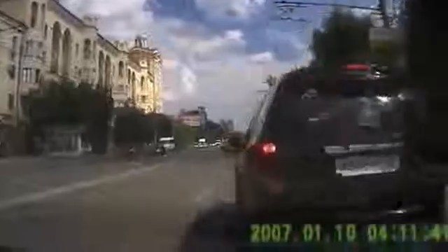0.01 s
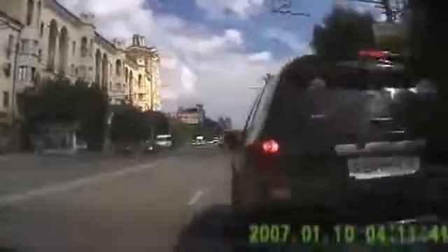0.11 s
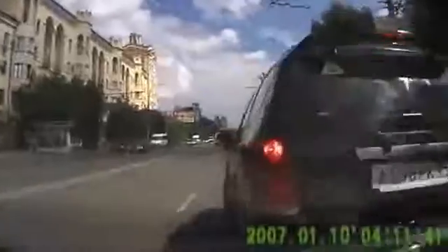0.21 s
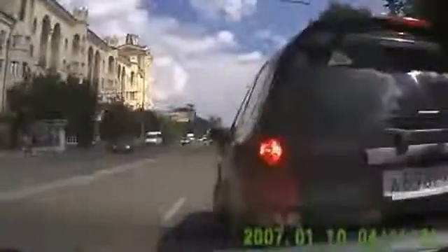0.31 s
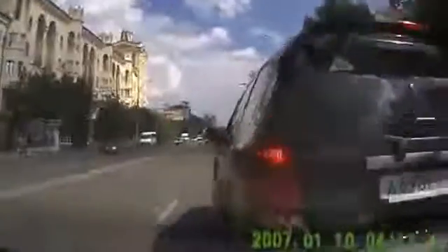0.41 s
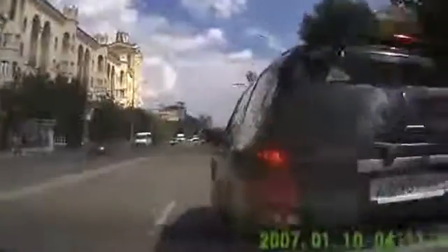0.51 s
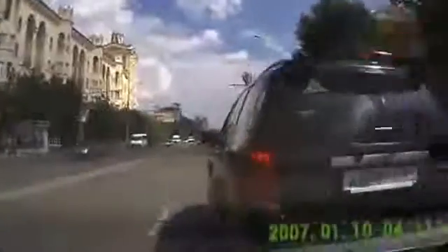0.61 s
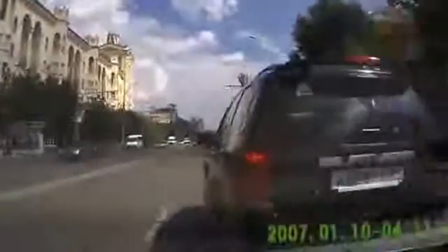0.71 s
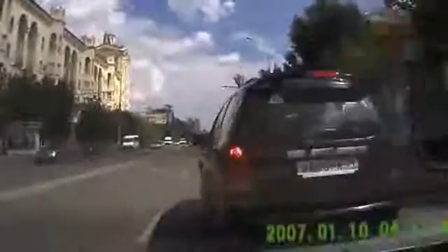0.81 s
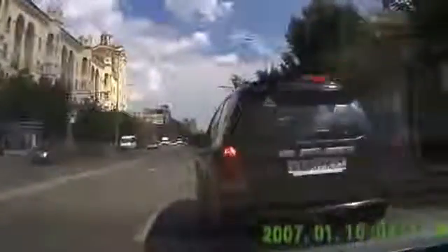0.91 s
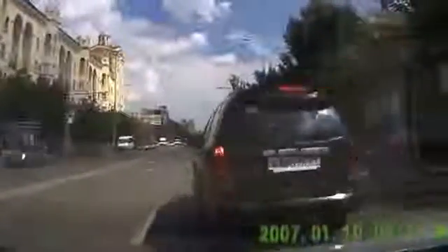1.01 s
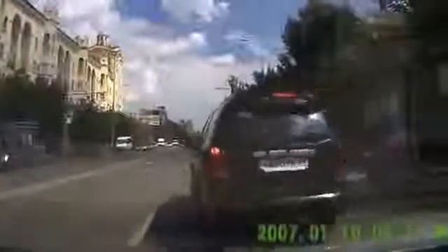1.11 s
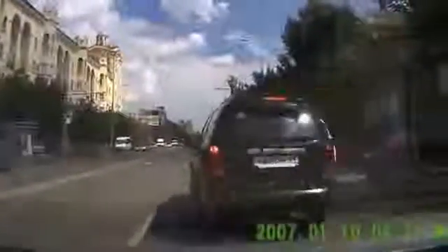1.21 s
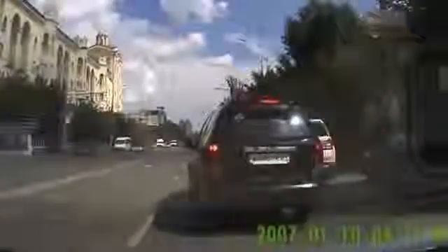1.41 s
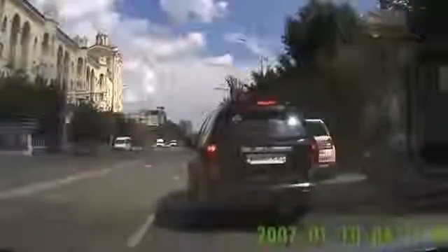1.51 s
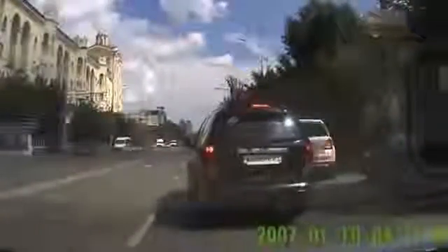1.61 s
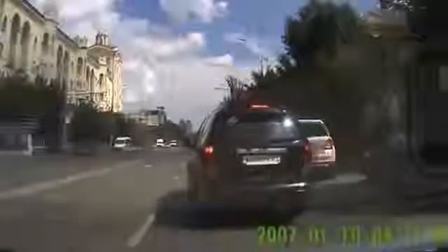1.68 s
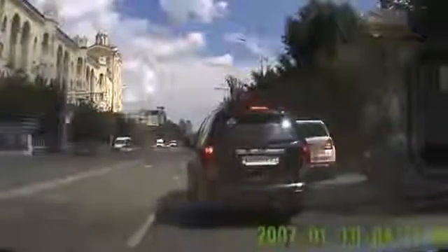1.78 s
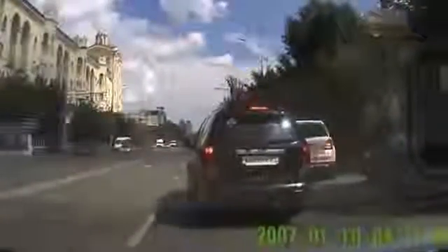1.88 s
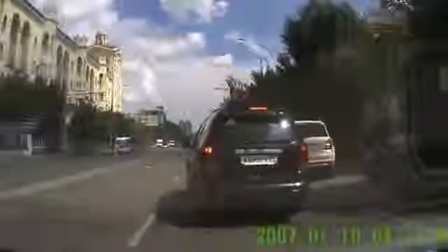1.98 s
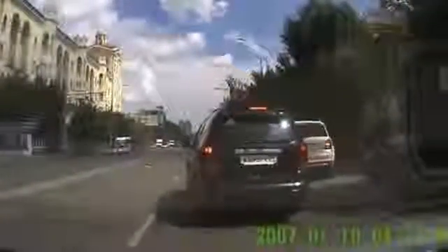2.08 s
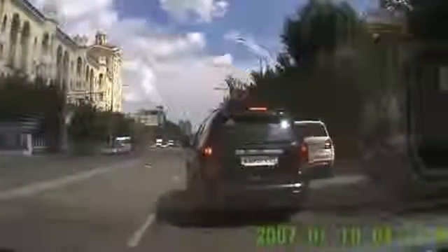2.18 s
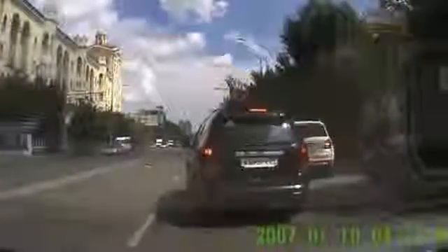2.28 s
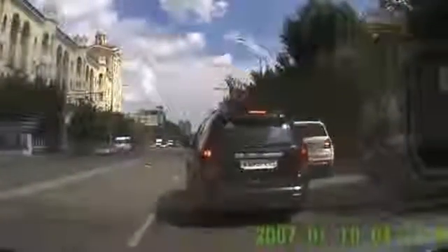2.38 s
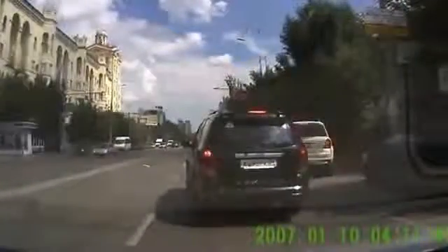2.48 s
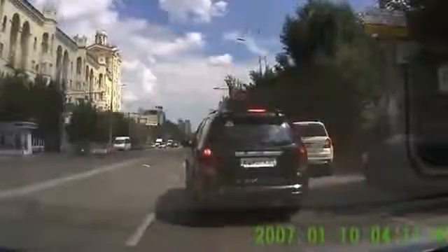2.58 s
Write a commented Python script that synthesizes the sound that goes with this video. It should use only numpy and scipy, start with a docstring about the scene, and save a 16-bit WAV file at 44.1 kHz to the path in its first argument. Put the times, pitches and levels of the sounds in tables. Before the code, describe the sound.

A car crash: tyres squeal under hard braking, then a bumper crunches and loose things rattle inside

```python
"""A low-speed rear-end collision, heard inside the car through a small, narrow-band microphone.
Over the street and a faint hum, plastic cracks in short noise bursts before, during and after the impact.
Under hard braking the tyres stick, slip and squeal and the body judders; from then on grit scrapes and
plastic chirps. Bucklings ring and crunch the bumper; then loose things strike ringing trim, the squeal
returns briefly, and filtered noise makes the traffic swish past the stopped car, swelling towards the end."""
import sys
import numpy as np
from scipy import signal
from scipy.fft import rfft, irfft, next_fast_len
from scipy.io import wavfile
from scipy.ndimage import uniform_filter1d

SR = 44100
rng = np.random.default_rng(int(sys.argv[2]) if len(sys.argv) > 2 else 0)


def dump(signal):
    """Clip the signal to [-1, 1] and save it as 16-bit WAV at the path in sys.argv[1]."""
    limited = np.clip(np.atleast_2d(signal).T, -1, 1)
    pcm = np.round(limited * 32767).astype(np.int16)
    wavfile.write(sys.argv[1], SR, pcm)


N = 114660
T = np.arange(N) / SR   # time in s


def from_db(db):
    """Decibels to gain."""
    return 10 ** (np.asarray(db) / 20)


def rms_one(x):
    """Scale to unit power."""
    return x / np.sqrt(np.mean(x ** 2) + 1e-20)


def level(rows):
    """Gain over time from (t/s, .., level/dB) rows, with a fast fade before the first and after the last."""
    rows = np.array(rows)
    beyond_s = np.abs(T - np.clip(T, rows[0, 0], rows[-1, 0]))
    fade = np.exp(-(beyond_s / .04) ** 2)
    return from_db(np.interp(T, rows[:, 0], rows[:, -1])) * fade


def colour(x, points):
    """Minimum-phase filter through (f/Hz, level/dB) points, 12 dB an octave down outside; unit power gain."""
    hz, db = np.transpose(points)
    size = next_fast_len(len(x) + 8192, True) // 2 * 2
    octave = np.log2(np.maximum(np.fft.rfftfreq(size, 1 / SR), 5))
    outside = np.abs(octave - np.clip(octave, np.log2(hz[0]), np.log2(hz[-1])))
    gain = rms_one(from_db(np.interp(octave, np.log2(hz), db) - 12 * outside))
    # folding the cepstrum forward keeps the response from sounding ahead of its cause
    cepstrum = irfft(np.log(gain))
    cepstrum[1:size // 2] *= 2
    cepstrum[size // 2 + 1:] = 0
    response = np.exp(rfft(cepstrum))
    return irfft(rfft(x, size) * response)[:len(x)]


def drift(rate):
    """Slow chance with unit spread: noise through a two-pole lowpass at a rate in Hz."""
    r = np.exp(-2 * np.pi * rate / SR)
    settled = signal.lfilter([1], [1, -2 * r, r * r], rng.standard_normal(N + SR))[SR:]
    return rms_one(settled)


def steady(x, span_s):
    """Even out the strength of a vibration over a span."""
    power = uniform_filter1d(x * x, max(int(span_s * SR), 2))
    return x / np.sqrt(np.abs(power) + 1e-12)


def ring(x, hz, t60):
    """A mode: a unit click starts a dying sine of height 1."""
    r, w = from_db(-60 / (t60 * SR)), 2 * np.pi * hz / SR
    return signal.lfilter([0, np.sin(w)], [1, -2 * r * np.cos(w), r * r], x + 1e-18)


def grains(per_s, spread_db):
    """Random clicks of uneven size and either sign, at unit power."""
    sizes = from_db(spread_db * np.minimum(rng.exponential(1, N), 4)) * rng.choice([-1, 1], N)
    return rms_one(sizes * (rng.random(N) < per_s / SR))


def burst(t60, size=8192):
    """Noise that dies away from a sudden start."""
    return rng.standard_normal(size) * from_db(-60 * T[:size] / t60)


def add(out, s, x):
    """Mix x in at a time."""
    start = int(s * SR)
    out[start:start + len(x)] += x[:N - start]


def cabin(x, wet_db):
    """Dense, short reflections from glass and trim, 0.15 s long, starting 2 ms after the direct sound."""
    tail = burst(t60=.15) * (T[:8192] > .002)
    wet = from_db(wet_db)
    reflected = signal.fftconvolve(x, tail / np.linalg.norm(tail))[:N]
    return (x + wet * reflected) / np.sqrt(1 + wet ** 2)


CRASH_S, CRASH_ATTACK_S, CRASH_HOLD_S = 0.435, 0.015, 0.029


def crush(fall_db_per_s, late_s=0):
    """Force of the collision: attack, hold, then a release at a steady rate."""
    age = T - CRASH_S - late_s
    attack = np.clip(age / CRASH_ATTACK_S, 0, 1)
    release_s = np.maximum(age - CRASH_ATTACK_S - CRASH_HOLD_S, 0)
    return attack * from_db(-fall_db_per_s * release_s)


BODY_DB, CRUNCH_DB, CRUNCH_FALL_DB_PER_S, BUCKLES_PER_S = -14.5, -12.5, 144, 2500
# for the lowest mode; higher modes fall faster and come in sooner
LOWEST_FALL_DB_PER_S, DAMPING_SLOPE, LOWEST_LATE_S = 176, 0.17, 0.012
# modes of the car body: f/Hz, relative level/dB, t60/s
BODY_MODES = [(152.8, 3, 0.28), (170.3, -0.5, 0.066), (258, -3, 0.16), (375, 4.5, 0.089),
              (415, -1.5, 0.091), (533, -9, 0.083), (627, -7.5, 0.41), (682, -6, 0.18), (743.6, -3.5, 0.24),
              (846, -11.5, 0.11), (934, -11, 0.18)]
# colour of the crumpling bumper: f/Hz, relative level/dB
CRUNCH_COLOUR = [(100, -2), (400, -2), (800, -3.5), (1200, -1.5), (2000, -2), (3000, -9), (4500, -20)]


def crash():
    """A rush of small bucklings keeps the body modes ringing, and crunches."""
    body, lowest_hz = 0, BODY_MODES[0][0]
    for hz, db, t60 in BODY_MODES:
        fall = LOWEST_FALL_DB_PER_S * (hz / lowest_hz) ** DAMPING_SLOPE
        force = crush(fall, LOWEST_LATE_S * (lowest_hz / hz) ** 2)
        mode = steady(ring(grains(BUCKLES_PER_S, spread_db=2), hz, t60), .035)
        body = body + from_db(db + BODY_DB) * force * mode
    crunch = cabin(colour(grains(BUCKLES_PER_S, spread_db=3.0), CRUNCH_COLOUR), wet_db=-13)
    return body + from_db(CRUNCH_DB) * crush(CRUNCH_FALL_DB_PER_S) * steady(crunch, 0.012)


SNAP_T60_S, SNAP_WIDTH = 0.0088, 0.2   # width as a fraction of the centre pitch
# plastic snaps: t/s, relative level/dB, centre f/Hz
SNAPS = [(0.028, -26.5, 3130), (0.147, -17, 1700), (.16, -12, 1505), (.165, -15, 1580), (.211, 2.5, 1920),
         (.237, -9.5, 3250), (0.245, -2, 2090), (0.258, -9.5, 2430), (.325, 1, 2180), (0.443, -7.5, 2800),
         (.546, -11.5, 1900), (0.56, -0.5, 1740), (.57, 1.5, 1860), (0.577, 4, 1600), (0.608, 1, 1590),
         (0.7602, -4.5, 2660), (1.165, -19.5, 2770), (1.458, -8.5, 1730)]


def snaps(gain_db):
    """Plastic gives way in very short, bright cracks of noise around a centre pitch."""
    out = np.zeros(N)
    for s, db, hz in SNAPS:
        band = [(hz / 4, -15), (hz / (1 + SNAP_WIDTH), -7), (hz, 0),
                (hz * (1 + SNAP_WIDTH), -7), (hz * 2.33, -23)]
        crack = colour(burst(SNAP_T60_S), band)
        add(out, s, from_db(db + gain_db) * rms_one(crack))
    return cabin(out, wet_db=-10.0)


# tyre squeal under braking: t/s, centre f/Hz, level/dB
BRAKING_SQUEAL = [(.21, 1668, -39), (.25, 1670, -23), (.288, 1595, -11.5), (.335, 1535, -19),
                  (.368, 1555, -13.5), (.45, 1530, -15.5), (.51, 1570, -19), (.55, 1661, -17.5),
                  (.6, 1563, -23), (.68, 1633, -26), (.76, 1595, -30), (.88, 1666, -37.5), (1.1, 1630, -49)]
# the brief squeal afterwards: t/s, centre f/Hz, level/dB
LAST_SQUEAL = [(1.4, 1635, -57), (1.45, 1675, -26.5), (1.485, 1665, -35.5), (1.52, 1647, -29.5),
               (1.59, 1646, -46.5), (1.67, 1651, -46), (1.76, 1655, -41), (1.9, 1653, -54)]
# voices that squeal together: pitch ratio before spread [1], relative level/dB
TYRE_VOICES = [(1, 1), (1.05, -4.5), (.94, -7.5)]


def squeal(rows, wander, rough, spread, octave_db, flutter_db):
    """Tyres stick and slip at nearly the same, unsteady pitch and beat together, each with its octave."""
    times, pitches, _ = np.transpose(rows)
    pitch, tone, octave, gain = np.interp(T, times, pitches), 0, 0, level(rows)
    for ratio, db in TYRE_VOICES:
        unsteady = 1 + wander * drift(35.24) + rough * drift(380)
        phase = 2 * np.pi * np.cumsum(pitch * ratio ** spread * unsteady) / SR
        grip = from_db(db + flutter_db * drift(45))
        tone = tone + grip * np.sin(phase)
        octave = octave + grip * np.sin(2 * phase + 0.6 * drift(150))   # phase jitter in rad
    tone = steady(cabin(tone, wet_db=-5.5), 0.03)
    octave = steady(cabin(octave, wet_db=-15.5), 0.029)
    return gain * (tone + from_db(octave_db) * octave)


BOOM_HZ, BOOM_TONE_DB, BOOM_NOISE_DB = 43.25, 1, -6.5   # levels relative to the boom curve
JUDDER_ONSET_DB = -36   # below this the springs barely ring
# strength of the cabin's low boom: t/s, level/dB
BOOM = [(0, -27.5), (.12, -34.5), (.2, -28), (.22, -11), (.28, -22.5), (.37, -14), (.45, -23), (.5, -16),
        (.555, -10.5), (.6, -22.5), (.68, -21), (.715, -28), (.9, -41.5), (1.01, -30), (1.12, -49),
        (1.4, -50), (1.46, -42.5), (1.58, -51), (2.6, -43)]
# rumble of wheels and suspension: t/s, level/dB
RUMBLE = [(0, -33.5), (.135, -38.5), (.16, -32.5), (.195, -33.5), (.24, -25), (.32, -28), (.43, -46.5),
          (.6, -16.5), (.67, -25), (.74, -34.5), (.88, -31.5), (1.0, -35), (1.1, -40.5), (1.28, -38),
          (1.4, -39), (1.445, -32), (1.54, -39.5), (1.7, -45.5), (2.6, -48.5)]
# its colour: f/Hz, relative level/dB
RUMBLE_COLOUR = [(30, -0.5), (90, -2), (160, -2), (230, -9.5), (380, -10), (600, -20.5), (1200, -41)]


def chassis():
    """The body judders on its springs when shaken hard, the cabin air booms, the wheels rumble."""
    boom = level(BOOM)
    sway = np.sin(2 * np.pi * np.cumsum(BOOM_HZ * (1 + 0.098 * drift(15))) / SR)
    judder = np.sqrt(2) * sway * boom / (boom + from_db(JUDDER_ONSET_DB))
    air = colour(rng.standard_normal(N), [(24, -4), (38, 3.5), (60, -2), (90, -7.0)])
    shake = steady(air, 0.043)
    rumble = steady(colour(rng.standard_normal(N), RUMBLE_COLOUR), 0.14)
    low_end = from_db(BOOM_TONE_DB) * judder + from_db(BOOM_NOISE_DB) * shake
    return boom * low_end + level(RUMBLE) * rumble


KNOCK_NOISE_DB, RATTLE_GRAINS_PER_S, RATTLE_SPREAD_DB = -0.5, 3000, 1.5
# loose things strike the trim:
# t/s, blow level/dB, rattle t60/s, brightness/(dB per octave), panel level relative to the blow/dB
KNOCKS = [(0.895, -18.5, 0.04, 7, -25.5), (.918, -22.5, 0.07, -0.5, -0.5), (0.931, -21.5, .07, 10, -8.5),
          (.949, -12.5, .06, 3.5, -4.5), (0.953, -16.5, 0.13, -3, -3.5), (.96, -18, 0.055, 3, -6.5),
          (.983, -20, 0.055, 3.5, -8.5), (1.011, -26.5, 0.12, 5, -0.5), (1.021, -23, 0.072, 3.5, 1.5),
          (1.308, -19, 0.084, 4, -23.5), (1.411, -27, .05, 0, -6), (1.435, -29.5, 0.054, -5, -6),
          (1.444, -21, 0.06, 0.5, -2), (1.454, -25, .05, -2, -4.5), (1.51, -28, 0.2, 0, -11)]
# colour of the rattle before brightness: f/Hz, relative level/dB
KNOCK_COLOUR = [(100, -25.5), (400, 5.5), (650, 1), (820, -6.5), (1100, -4.5), (2000, -1.5), (3000, -13),
                (4500, -23)]
# modes of the hollow panel: f/Hz, relative level/dB, t60/s
PANEL_MODES = [(381, -6, .13), (1022, 1, 0.094), (1389, -4.5, 0.11), (1928, -7, .07), (2163, -13.5, 0.055),
               (2500, -15, .07), (2820, -14.5, .06), (3690, -18, 0.083)]


def knocks():
    """Each loose thing lands with a short, gritty rattle and sets a hollow panel ringing."""
    rattles, blows = np.zeros(N), np.zeros(N)
    uneven = from_db(RATTLE_SPREAD_DB * drift(210))
    for s, db, t60, bright, panel_db in KNOCKS:
        # brightness tilts the colour around 1 kHz
        tilted = [(hz, band_db + bright * np.log2(hz / 1000)) for hz, band_db in KNOCK_COLOUR]
        noise = burst(t60)
        touching = rms_one(1.0 * (rng.random(len(noise)) < RATTLE_GRAINS_PER_S / SR))
        add(rattles, s, from_db(db + KNOCK_NOISE_DB) * colour(noise * touching, tilted))
        blows[int(s * SR)] += from_db(db + panel_db)
    panel = sum(from_db(db) * ring(blows, hz, t60) for hz, db, t60 in PANEL_MODES)
    return rattles * uneven + panel


CONTACT_S = .0015   # how long a contact lasts


def struck(hits, modes):
    """Each contact rings every mode with a strength and timing of its own."""
    out = 0
    for hz, mode_db, t60 in modes:
        clicks = np.zeros(N)
        for s, db in hits:
            when = s + CONTACT_S * rng.random()
            clicks[int(when * SR)] += from_db(db + mode_db + rng.standard_normal())
        out = out + ring(clicks, hz, t60)
    return out


# contacts of a small hard object: t/s, level before the mode's own/dB
CLACKS = [(.895, -10), (.92, -25)]
# its modes: f/Hz, relative level/dB, t60/s
CLACK_MODES = [(547, -6, 0.045), (676, -8.5, 0.039), (1005, -8.5, 0.053), (1425, 2, 0.032),
               (1770, -8, 0.035), (2870, -14, 0.0232)]


def clack():
    """A small hard object lands, and its short modes ring."""
    return struck(CLACKS, CLACK_MODES)


# contacts of a larger, boxy object: t/s, level before the mode's own/dB
CLONKS = [(1.3075, -19.5), (1.317, -24)]
# its modes: f/Hz, relative level/dB, t60/s
CLONK_MODES = [(577, -3, 0.056), (685, 0, 0.065), (1070, -7.5, .05), (1225, -8, 0.13), (1320, -3, 0.046),
               (1816, -2, .08), (2070, -3.5, 0.076), (2240, -5, .04), (2832, -14.5, .07),
               (3400, -9.5, 0.0245)]


def clonk():
    """A larger, boxy object falls and bounces once, ringing its modes at both contacts."""
    return struck(CLONKS, CLONK_MODES)


# bumps of the suspension and of heavier things: t/s, relative level/dB, centre f/Hz, t60/s
BUMPS = [(0.147, -14.5, 129.4, 0.12), (.775, -24.5, 494, .08), (0.866, -20.5, 203, 0.09),
         (1.263, -30, 228, 0.083), (1.418, -24, 351, 0.067), (1.432, -21.5, 134.4, .1),
         (1.482, -26.5, 120, 0.08), (2.029, -23.5, 685, 0.35)]


def bumps(gain_db):
    """Soft contacts give a short, dull thud of narrow-band noise."""
    out = np.zeros(N)
    for s, db, hz, t60 in BUMPS:
        thud = colour(burst(t60), [(hz / 1.3, -9), (hz, 0), (hz * 1.3, -9)])
        add(out, s, from_db(db + gain_db) * rms_one(thud))
    return out


# short rubbing squeaks: t/s, peak level of the direct tone before the cabin/dB, middle f/Hz, length/s
SQUEAKS = [(0.23, -27.5, 4020, 0.014), (.793, -22, 1860, 0.025), (1.138, -34, 2950, 0.012),
           (1.158, -28, 2810, 0.0097), (1.503, -28.5, 1950, 0.04), (1.59, -35, 1950, 0.058)]
SQUEAK_RISE_PER_S = .3   # fraction of the middle pitch


def squeaks(rough):
    """Rubbing plastic chirps briefly, rising a little at a rough pitch."""
    out = 0
    for s, db, hz, length in SQUEAKS:
        age = np.clip(T - s, 0, length)
        pitch = hz * (1 + SQUEAK_RISE_PER_S * (age - length / 2) + rough * drift(200))
        swell = np.sin(np.pi * age / length)
        out = out + from_db(db) * swell * np.sin(2 * np.pi * np.cumsum(pitch) / SR)
    return cabin(out, wet_db=-16.0)


GRAINS_PER_S = 2200
# gritty sliding of tyres and loose things: t/s, level/dB
SCRAPE = [(.11, -63), (.16, -36), (.205, -41.5), (.24, -25), (.4, -27), (.58, -33.5), (.7, -39.5),
          (.85, -40), (.91, -26.5), (1.02, -44.5), (1.08, -60), (1.12, -48), (1.19, -32.5), (1.23, -35),
          (1.255, -56), (1.3, -63), (1.37, -40), (1.46, -38), (1.6, -39), (1.7, -64), (1.9, -58)]
# its colour: f/Hz, relative level/dB
SCRAPE_COLOUR = [(200, -8.5), (700, -7.5), (1300, 4.5), (2000, 3), (2600, -7), (3300, -6), (4500, -14.5)]


def scrape():
    """Dense clicks of grit under whatever slides."""
    grit = colour(grains(GRAINS_PER_S, spread_db=2.0), SCRAPE_COLOUR)
    return level(SCRAPE) * steady(cabin(grit, wet_db=-4.5), .08)


HUM_HZ, HUM_DB, SWISH_FLICKER_DB = 295, -50, 0.9
# the street, with a car going by: t/s, level before flicker/dB
STREET = [(0, -39.5), (.6, -50), (1.1, -42.5), (1.6, -40), (1.95, -38), (2.05, -36), (2.3, -33),
          (2.45, -37), (2.6, -38.5)]
# its colour through the glass: f/Hz, relative level/dB
STREET_COLOUR = [(30, 5.5), (80, -3.5), (180, -10.5), (250, -3.5), (400, -8.5), (520, -5), (700, -1),
                 (820, -5), (1000, 1.5), (1250, 1), (1600, -5.5), (2000, -10), (2600, -14.5), (3300, -25.5),
                 (3900, -22), (4500, -34)]


def street():
    """Tyre swish of the traffic, as flickering noise, comes through the glass over a faint hum."""
    swish = steady(colour(rng.standard_normal(N), STREET_COLOUR), 0.19)
    flicker = from_db(SWISH_FLICKER_DB * drift(27))
    hum = np.sqrt(2) * np.sin(2 * np.pi * np.cumsum(HUM_HZ * (1 + 0.0089 * drift(8.7))) / SR)
    return level(STREET) * swish * flicker + from_db(HUM_DB) * hum


def scene():
    """Everything that reaches the microphone, as one channel."""
    plastic = snaps(gain_db=-32.0) + squeaks(rough=0.028)
    tyres = squeal(BRAKING_SQUEAL, wander=.016, rough=.017, spread=0.99, octave_db=-16.0, flutter_db=3.5)
    tyres = tyres + squeal(LAST_SQUEAL, wander=0.0085, rough=.016, spread=0.35, octave_db=-14, flutter_db=2)
    loose = knocks() + clack() + clonk() + bumps(gain_db=-19.5)
    return (crash() + plastic + tyres + chassis() + loose + scrape() + street())[None]


OVERLOAD, CLIP_LEVEL = 1.35, .95   # amplitudes
BAND_HZ, CUTOFF_HZ = 4748, 15500


def record(dry):
    """The microphone overloads softly, the recorder keeps a narrow band, and the highest peaks clip."""
    x = OVERLOAD * np.tanh(dry / OVERLOAD)
    x = signal.sosfilt(signal.butter(10, 4200, fs=SR, output="sos"), x)
    x = signal.sosfilt(signal.ellip(8, .3, 70, BAND_HZ, fs=SR, output="sos"), x)
    clipped = np.clip(x, -CLIP_LEVEL, CLIP_LEVEL)
    return signal.sosfilt(signal.cheby2(12, 70, CUTOFF_HZ, fs=SR, output="sos"), clipped)


dry = scene()
out = record(dry)
dump(out)
```